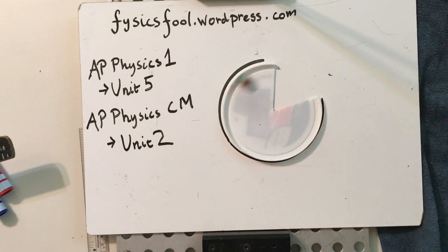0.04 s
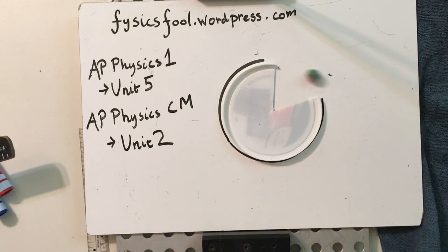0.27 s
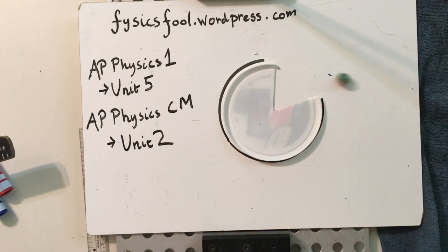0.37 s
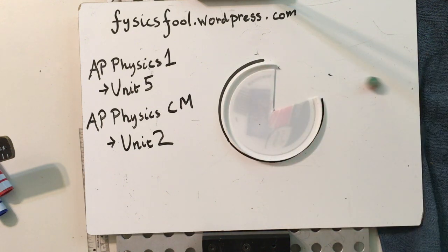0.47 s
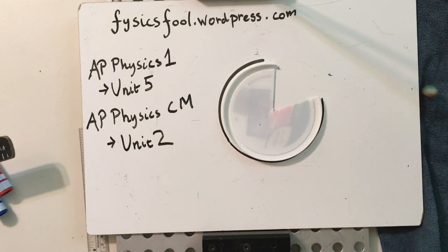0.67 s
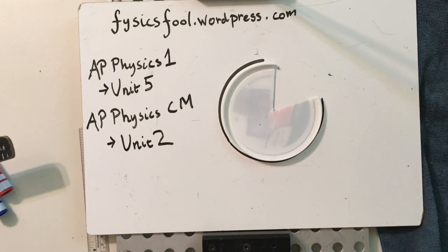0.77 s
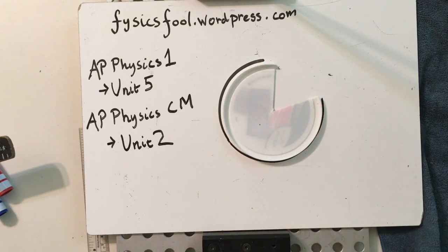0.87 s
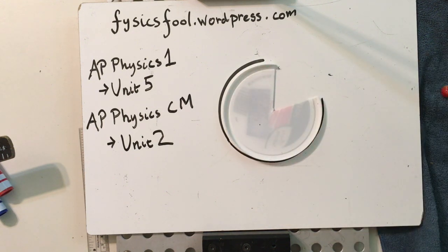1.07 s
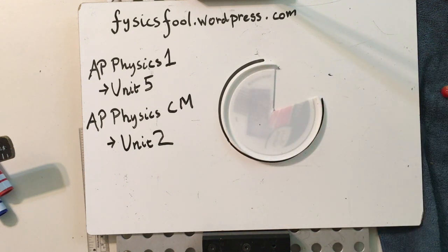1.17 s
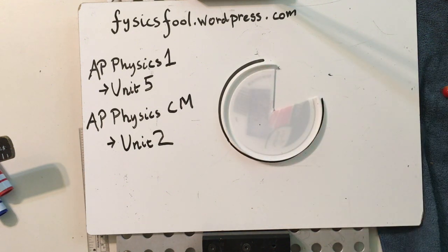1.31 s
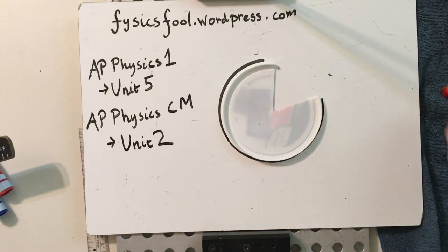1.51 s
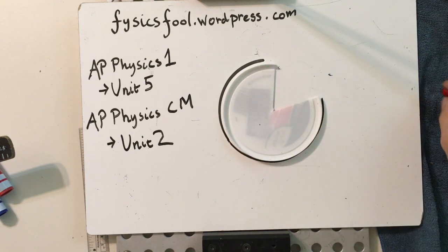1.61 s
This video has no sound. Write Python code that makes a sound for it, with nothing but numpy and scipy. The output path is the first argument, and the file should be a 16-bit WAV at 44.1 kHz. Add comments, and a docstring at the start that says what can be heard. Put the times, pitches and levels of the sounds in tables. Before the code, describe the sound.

A marble rattles lightly along the wall of a plastic lid, then lands on a board with one knock and a brief, gritty roll. The classroom adds a slight echo, and only a low ventilation hum remains.

```python
"""Marble onto a whiteboard

A glass marble runs round the rim of a thin plastic lid, ticking against its wall, and drops out of the
gap onto a whiteboard. The board knocks, then rumbles under the rolling marble until it runs off the
edge onto cloth. A classroom rings briefly after it, over a low ventilation hum."""
import sys
import numpy as np
from scipy import signal
from scipy.fft import rfft, irfft
from scipy.io import wavfile

SR = 44100
rng = np.random.default_rng(int(sys.argv[2]) if len(sys.argv) > 2 else 0)


def inscribe(sig):
    """Save sig as 16-bit PCM at rate SR to the path in sys.argv[1].

    A 1-D sig is mono; a 2-D sig holds one channel per row.
    Samples are clipped to [-1, 1] before scaling.
    """
    pcm = np.round(np.clip(np.atleast_2d(sig).T, -1, 1) * 32767)
    wavfile.write(sys.argv[1], SR, pcm.astype(np.int16))


N = 72765

DROP_S, EDGE_S = .2369, .7088  # the marble lands on the board; it runs off the edge
LID_LAG_S, BOARD_LAG_S = .000983, .0007  # travel time of bending waves at 1 kHz

# ringing modes of the lid: f/Hz, level/dB, t60/s
LID_MODES = [(569, -6.5, 0.36), (640, -3.5, 0.15), (653.3, -14, 0.14), (1047, -19.5, .08),
             (1610, -17.5, .06), (2820, -11, 0.026), (3010, -0.5, 0.017), (3230, -11.5, 0.035)]
# how hard the marble rubs along the rim: t/s, level/dB
RUB_ENVELOPE = [(0, -56), (.03, -56.5), (.06, -58), (.09, -61), (.15, -58.5), (.178, -61), (.2, -64.5),
                (.235, -66.5)]
# ticks against the lid's wall: t/s, level/dB
TICKS = [(.0478, -39), (0.0664, -27.5), (.0772, -22), (0.091, -32.5), (0.1102, -26.5), (0.1233, -42.5),
         (.1300, -38), (0.1473, -32.5), (.1502, -39), (0.173, -42)]
# tone colours of the lid's crackle and a tick's snap: f/Hz, level/dB
CRACKLE_COLOUR = [(200, 3), (700, 6), (1100, 7.5), (1900, -2.5), (3000, 0.5), (4000, 2), (6000, -2),
                  (10000, -8), (12300, -5.5), (16000, -15)]
SNAP_COLOUR = [(200, -16), (700, -4.5), (1800, -11.5), (3000, 0.5), (4500, 1), (10000, -1), (12500, 1),
               (16000, -10.5)]

# tone colour of the ventilation's rumble and hiss: f/Hz, level/dB
AIR_COLOUR = [(20, -19), (35, -6), (52, 1), (76, -7), (112, -5.5), (160, -13.5), (215, -17), (300, -32),
              (400, -27.5), (550, -35.5), (1130, -42), (4870, -48.5), (11600, -45.5), (16000, -45)]
# the hum swells and sinks: t/s, level/dB
HUM_SWELL = [(0, -1), (.45, 1), (.8, 5), (1.0, 1.5), (1.2, -5.5), (1.65, -1.5)]

# tone colours of the knock's first crack and its short ring: f/Hz, level/dB
CRACK_COLOUR = [(100, -31), (330, -18.5), (520, -6), (700, 9.5), (950, -4), (1200, -3.5), (1600, -5),
                (2250, -16.5), (2800, -5), (3250, -2), (4300, -18.5), (8000, -16), (10300, -27),
                (12700, -15.5), (16000, -32.5)]
RING_COLOUR = [(100, -12), (400, -13), (700, 0), (1300, 0.5), (2000, -3), (3200, 0), (4600, -6.5),
               (9000, -13), (13000, -14.5), (16000, -28)]
# modes of the board, one entry each: f/Hz; t60/s
BOARD_HZ = [178, 570, 616, 680, 773, 845, 922, 1017, 1111, 1192, 1300, 1380, 1455, 1590, 2300, 2632, 2910,
            3200, 3428, 4694]
BOARD_T60_S = [0.086, .15, .13, .07, .075, .08, .09, .06, .055, .04, .09, .08, .08, .05, .11, .065, .06,
               0.028, 0.053, .1]
# their balance when knocked, rolled on near the lid and rolled on near the edge: level/dB
BOARD_KNOCK_DB = [-21, -12.5, -4, -1.5, -15, -5.5, -9.5, -2, -3.5, 1.5, -18, -18.5, -4, -6, -12.5, -1.5,
                  -12, -5, -16, -21]
BOARD_NEAR_DB = [-30.5, 2, 9.5, 6, 1.5, -6, -12, -16, -13.5, -20, -9, -13, -9, -14.5, -13, -9.5, -16, -16.5,
                 -16.5, -25]
BOARD_EDGE_DB = [-24, 0, -30, 0, -4.5, -2, -9, -10, -15, -0.5, 1.5, -4, -2, -6.5, -16, -11.5, -11.5, -21,
                 -48, -52]
# tone colour of the grit in the roll: f/Hz, level/dB
GRIT_COLOUR = [(100, -28), (300, -24), (480, -19), (590, 3), (680, 3), (820, -3), (1080, -14.5),
               (1370, 1.5), (1600, -7.5), (1850, -13.5), (2200, -5), (2550, -10.5), (3050, -6.5),
               (3700, -20.5), (4200, -17), (5200, -24), (9000, -24.5), (12500, -26), (16000, -33.5)]
# edges of the rumble's four bands: f/Hz
ROLL_BANDS_HZ = [100, 1000, 1900, 3700, 17000]
# the rumble across the board: t/s, then level/dB for low, middle, high and treble
ROLL_ENVELOPES = [(.24, -50, -46.5, -45.5, -46.5), (0.331, -47, -53.5, -60, -70),
                  (0.357, -44.5, -58, -83, -65), (0.373, -47.5, -50.5, -56, -64.5),
                  (.42, -47.5, -55.5, -66.5, -73), (0.463, -45.5, -51, -59.5, -68),
                  (.51, -56.5, -51, -65, -71), (0.546, -55, -53, -70.5, -73),
                  (0.563, -59, -51, -57.5, -65.5), (.60, -56, -52.5, -63.5, -74),
                  (.638, -54.5, -50.5, -53.5, -67.5), (0.676, -54, -56, -67, -74),
                  (.703, -52, -59, -58.5, -71.5)]


def undb(db):
    """Decibels to gain."""
    return 10 ** (np.asarray(db) / 20)


def unit(x):
    """Scale to an energy of one."""
    return x / np.sqrt(np.sum(x ** 2))


def level(x, db):
    """Scale to an rms level."""
    return x * undb(db) / np.std(x)


def clock():
    """The timeline in seconds."""
    return np.arange(N) / SR


def fade(t60):
    """Exponential decay, 60 dB down after t60 seconds."""
    return np.exp(-np.log(1000) * clock() / t60)


def ring(x, response):
    """Play x through an impulse response."""
    return signal.fftconvolve(x, response)[:N]


def delay(x, s):
    """Start x later by s seconds."""
    return np.concatenate([np.zeros(int(s * SR)), x])[:N]


def band(x, lo_hz, hi_hz):
    """Band-pass whose neighbours add up evenly."""
    hz = np.arange(N // 2 + 1) * SR / N
    order = 8
    return irfft(rfft(x) * (1 / (1 + (hz / hi_hz) ** order) - 1 / (1 + (hz / lo_hz) ** order)), N)


def colour(points):
    """A click of unit energy with an EQ curve of (f/Hz, level/dB) points."""
    hz, db = np.array(points, float).T
    size = 8192
    grid = np.maximum(np.arange(size // 2 + 1) * SR / size, 1)
    gain = undb(np.interp(np.log(grid), np.log(hz), db))
    cepstrum = irfft(np.log(gain))
    cepstrum[1:size // 2] *= 2  # minimum phase keeps the attack sharp
    cepstrum[size // 2 + 1:] = 0
    click = irfft(np.exp(rfft(cepstrum)))
    return np.pad(unit(click), (0, N - size))


def modes(rows):
    """Sum of decaying sines from (f/Hz, level/dB, t60/s) rows."""
    t = clock()[:SR // 2]
    tones = sum(undb(db) * unit(np.sin(2 * np.pi * hz * t) * np.exp(-np.log(1000) * t / t60))
                for hz, db, t60 in rows)
    return np.pad(tones, (0, N - len(t)))


def dense_ring(points, t60):
    """Many close modes: a coloured burst that dies away."""
    return unit(ring(rng.standard_normal(N) * fade(t60), colour(points)))


def bumps(per_s, spread_db):
    """Tiny contacts of a rolling ball at random moments, a few of them stronger."""
    size = undb(spread_db * np.minimum(rng.exponential(size=N), 4))
    return (rng.random(N) < per_s / SR) * size * rng.choice([-1, 1], N)


def disperse(x, lag_s):
    """Bending waves in a plate: the highs arrive first, the lows trail."""
    hz = np.arange(N + 1) * SR / (2 * N)
    travel = np.exp(-2j * np.pi * 2 * lag_s * np.sqrt(1000 * hz))
    return irfft(rfft(x, 2 * N) * travel)[:N]


def lid():
    """The marble rubs along the rim and ticks against it; both ring the thin plastic."""
    t, tones = clock(), modes(LID_MODES)
    pressure = undb(np.interp(t, *np.array(RUB_ENVELOPE).T)) * (t < DROP_S)
    crackle = undb(1.5) * disperse(colour(CRACKLE_COLOUR), LID_LAG_S)
    contacts = level(bumps(per_s=1700, spread_db=1.5), 0)
    rub = ring(contacts * pressure, unit(tones + crackle))
    hits = np.zeros(N)
    for s, db in TICKS:
        hits[int(s * SR)] += undb(db)
    snap = undb(-10.5) * disperse(colour(SNAP_COLOUR), LID_LAG_S)
    tail = undb(-2) * dense_ring(SNAP_COLOUR, t60=.017)
    return rub + ring(hits, undb(-5) * tones + snap + tail)


def ventilation():
    """A bed of low rumble and faint hiss, with a wavering fan tone."""
    t, fan_hz = clock(), 204.3
    air = irfft(rfft(rng.standard_normal(N)) * rfft(colour(AIR_COLOUR)), N)
    offset_hz = np.arange(N // 2 + 1) * SR / N - fan_hz
    waver = irfft(rfft(rng.standard_normal(N)) * np.exp(-(offset_hz / 6) ** 2), N)
    hum = level(np.sin(2 * np.pi * fan_hz * t), 0) + level(waver, 1.5)
    swell = undb(np.interp(t, *np.array(HUM_SWELL).T))
    return level(air, -58) + level(hum, -69.5) * swell


def board(levels_db):
    """The board's ring for one place of contact."""
    return modes(zip(BOARD_HZ, levels_db, BOARD_T60_S))


def knock():
    """The marble drops on the board: a crack, the board's modes and a short dense ring."""
    crack = undb(-.5) * colour(CRACK_COLOUR)
    body = undb(-15) * delay(board(BOARD_KNOCK_DB), s=.0012)
    tail = undb(-5) * dense_ring(RING_COLOUR, t60=.021)
    return delay(disperse(crack + body, BOARD_LAG_S) + tail, DROP_S)


def roll():
    """Small bumps shake the board; which of its modes speak depends on where the marble is."""
    t = clock()
    midway_s, crossfade_s, release_s = .492, .082, .0055
    across = np.clip((t - midway_s) / crossfade_s + .5, 0, 1)  # 0 near the lid, 1 near the edge
    contacts = bumps(per_s=3400, spread_db=3)
    grit = undb(4) * ring(bumps(per_s=3400, spread_db=3), colour(GRIT_COLOUR))
    near = ring(contacts, board(BOARD_NEAR_DB)) + grit
    far = ring(contacts, board(BOARD_EDGE_DB)) + grit
    times, *band_levels = np.array(ROLL_ENVELOPES).T
    rumble = 0
    for lo, hi, db in zip(ROLL_BANDS_HZ, ROLL_BANDS_HZ[1:], band_levels):
        blend = (1 - across) * level(band(near, lo, hi), 0) + across * level(band(far, lo, hi), 0)
        rumble += blend * undb(np.interp(t, times, db))
    release = np.exp(-np.maximum(t - EDGE_S, 0) / release_s)
    return rumble * (t > DROP_S) * release


def classroom(x):
    """A slap off the nearest wall and a short diffuse tail whose treble hangs on longest."""
    noise = rng.standard_normal(N)
    low = signal.sosfilt(signal.butter(1, 4000, fs=SR, output="sos"), noise)
    treble = undb(.5) * (noise - low)
    tail = unit(low * fade(t60=.25) + treble * fade(t60=.38))
    slap = delay(band(x, 220, 4500), s=.0118)
    reverb = ring(x, delay(tail, s=.004))
    return x + undb(-14.5) * slap + undb(-11.5) * reverb


def scene():
    """The marble's run in the classroom, over the ventilation bed, in mono."""
    marble = lid() + knock() + roll()
    return (classroom(marble) + ventilation())[None]


def record(dry):
    """Roll off the deepest bass and the very top."""
    low_cut = signal.butter(6, 37, "high", fs=SR, output="sos")
    high_cut = signal.ellip(8, .2, 70, 15900, fs=SR, output="sos")
    return signal.sosfilt(high_cut, signal.sosfilt(low_cut, dry))


dry = scene()
out = record(dry)
inscribe(out)
```